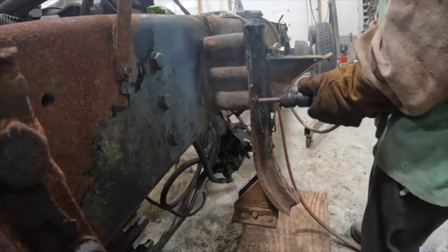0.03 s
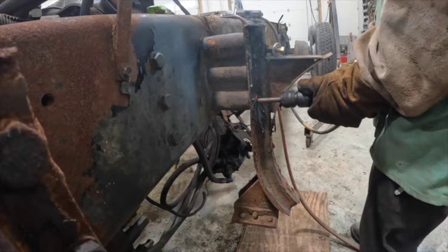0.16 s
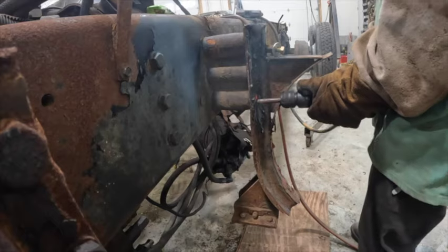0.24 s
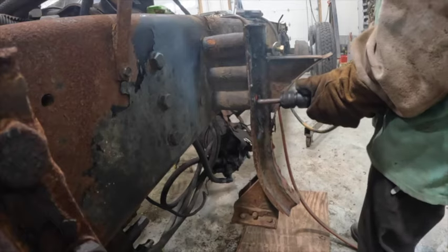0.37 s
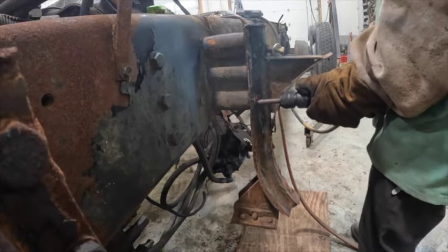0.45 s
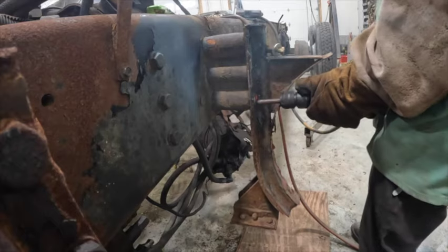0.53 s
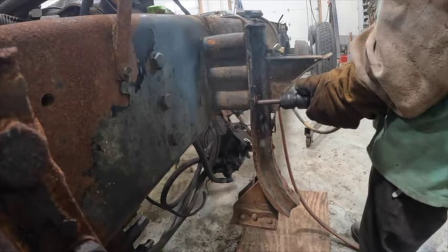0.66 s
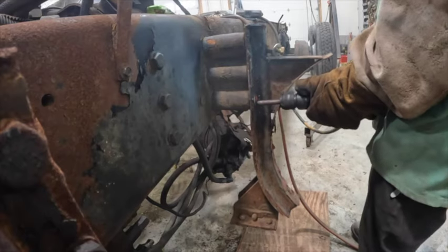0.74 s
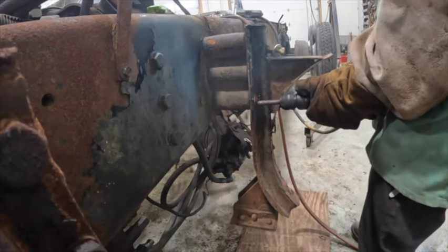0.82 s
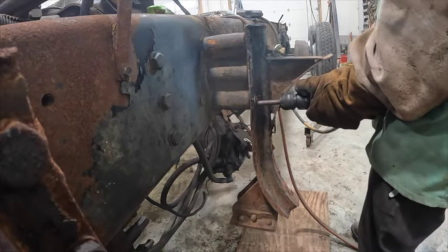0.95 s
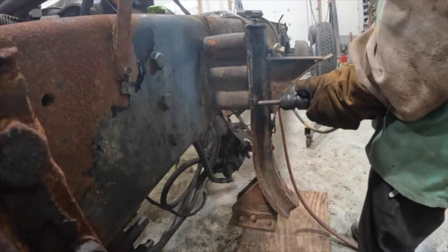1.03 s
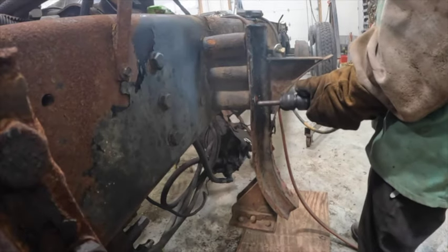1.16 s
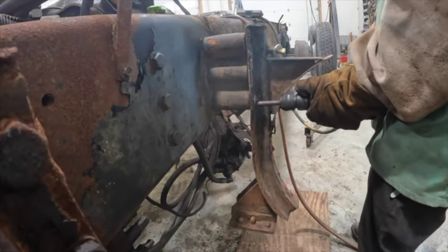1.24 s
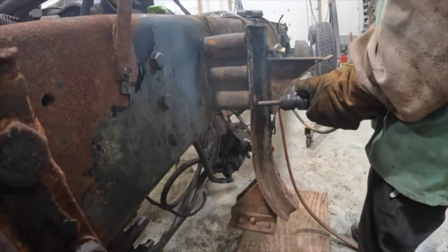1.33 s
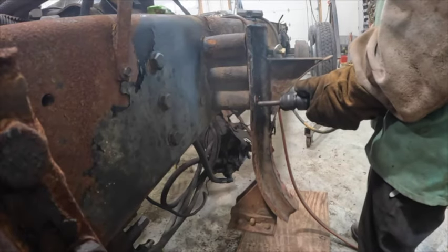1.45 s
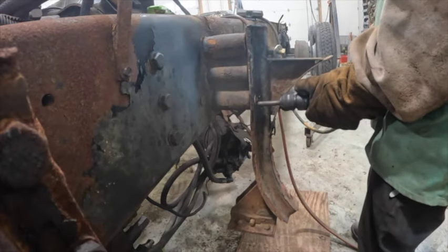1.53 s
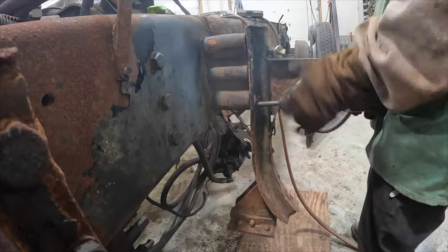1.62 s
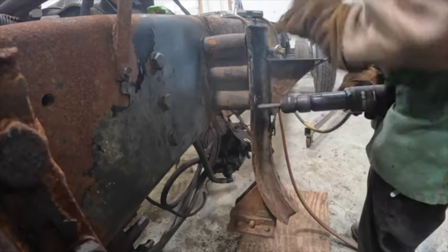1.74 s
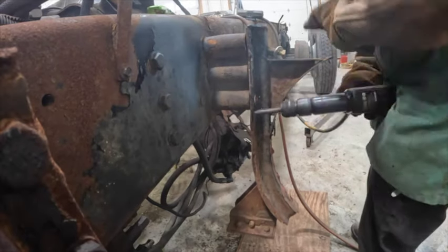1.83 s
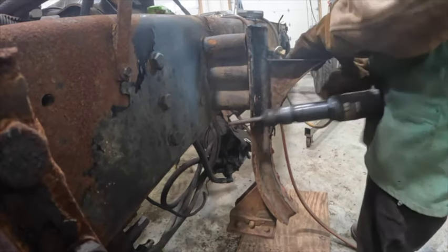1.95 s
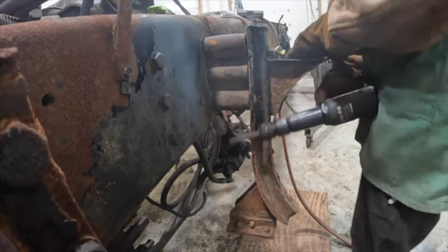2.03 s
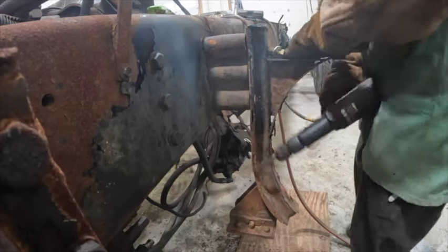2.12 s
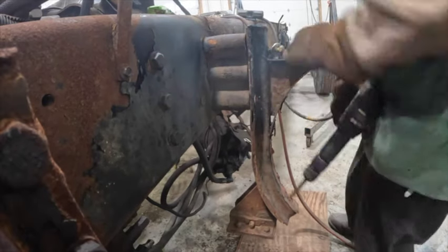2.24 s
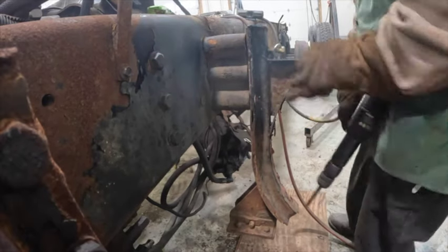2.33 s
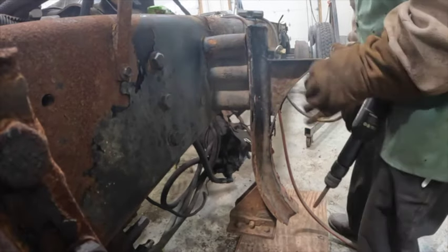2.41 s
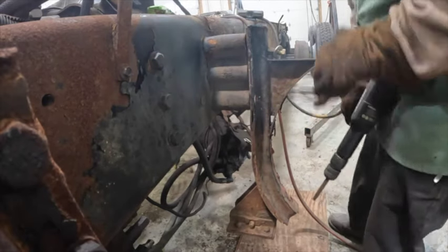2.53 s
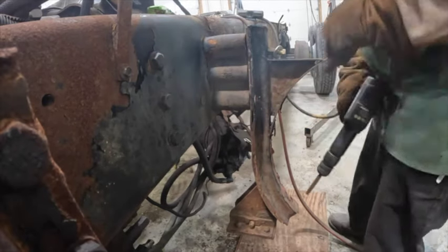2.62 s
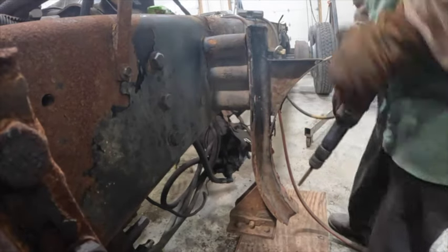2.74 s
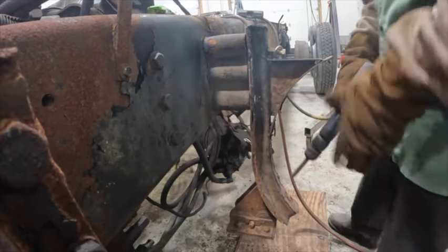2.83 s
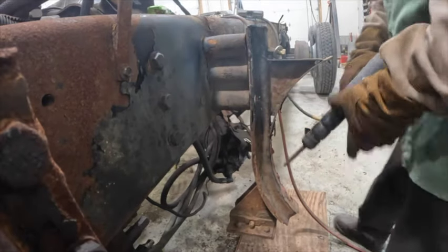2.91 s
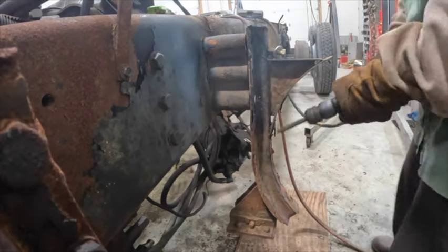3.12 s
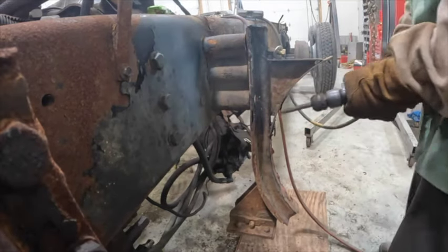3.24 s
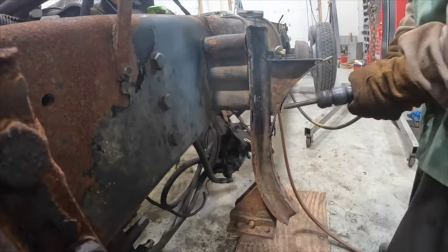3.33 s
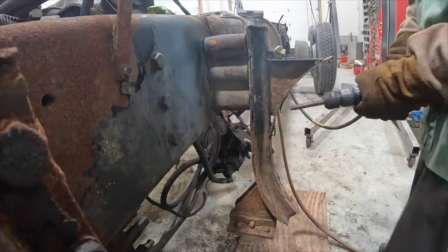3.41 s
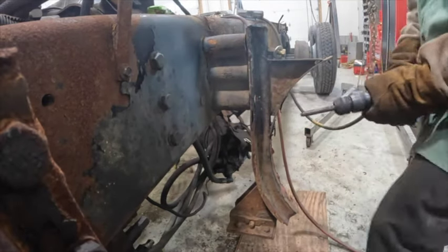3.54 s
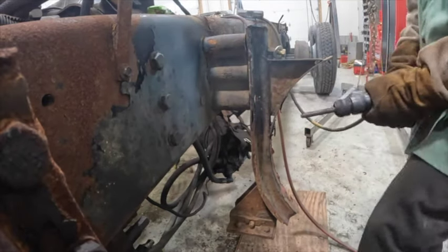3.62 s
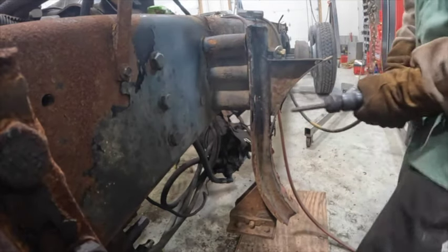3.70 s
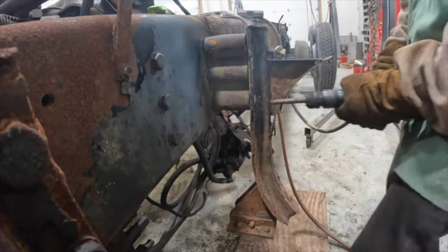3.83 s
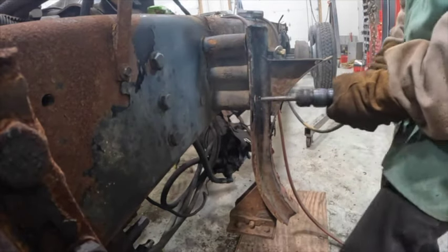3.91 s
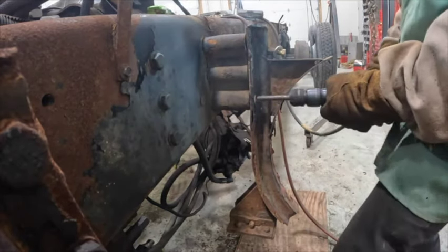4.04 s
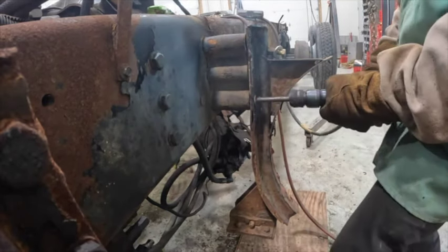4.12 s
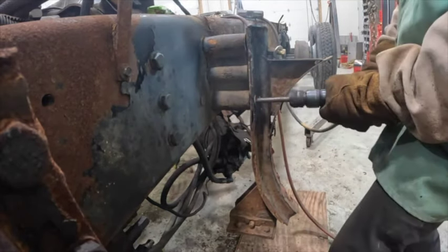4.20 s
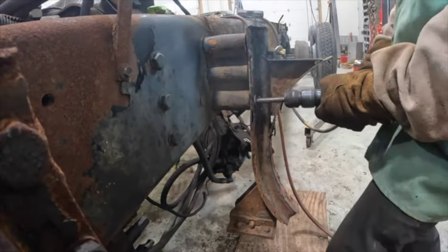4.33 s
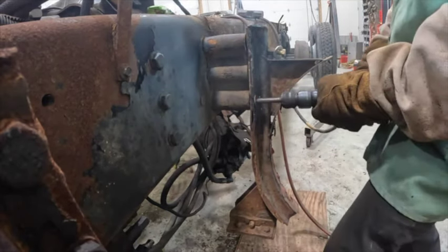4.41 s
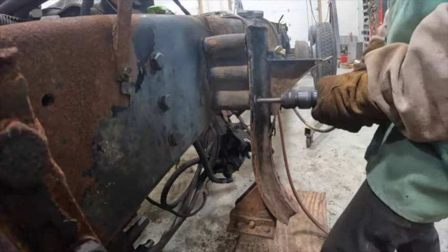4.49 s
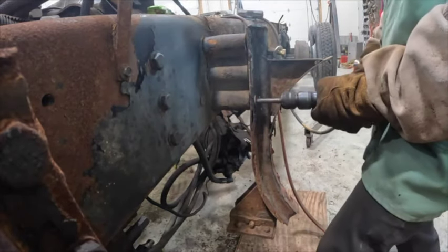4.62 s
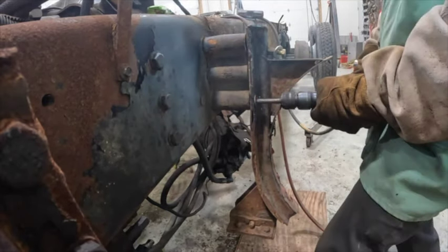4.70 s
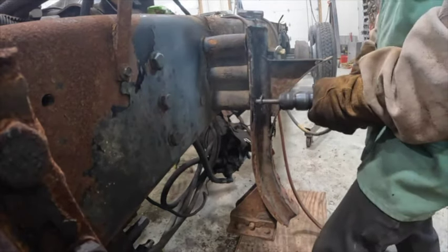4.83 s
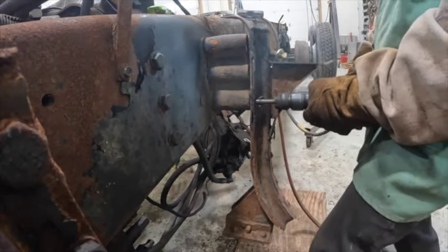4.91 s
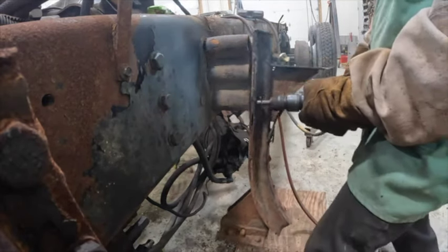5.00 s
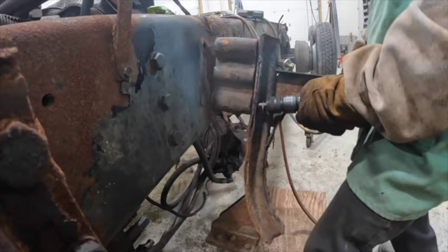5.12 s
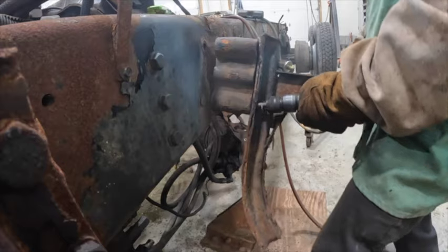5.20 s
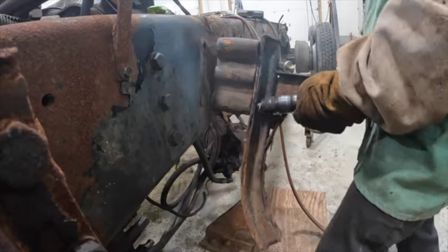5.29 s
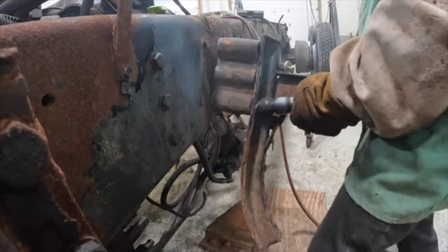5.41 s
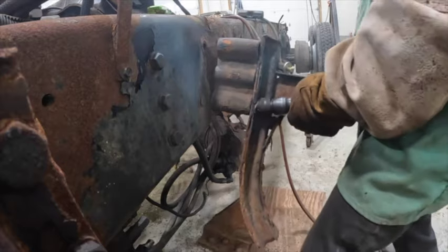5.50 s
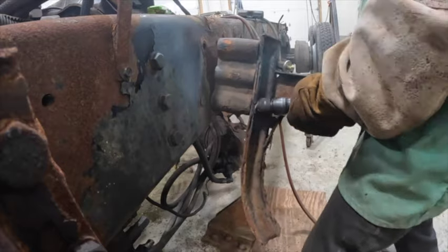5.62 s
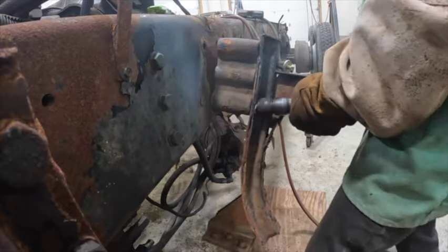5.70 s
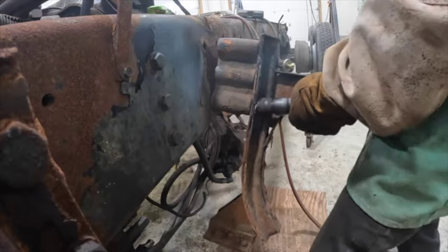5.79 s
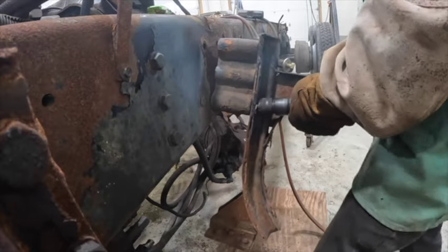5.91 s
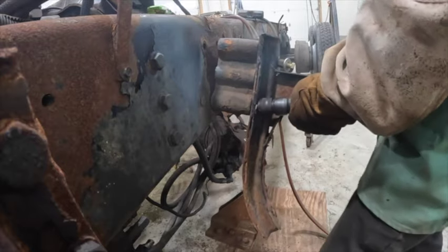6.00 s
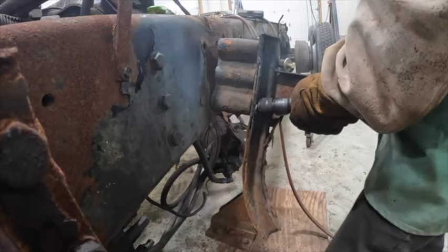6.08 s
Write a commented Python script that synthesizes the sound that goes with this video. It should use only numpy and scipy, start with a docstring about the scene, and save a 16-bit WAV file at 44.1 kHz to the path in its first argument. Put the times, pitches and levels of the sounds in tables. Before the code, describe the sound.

Rapid pneumatic hammering on heavy steel, a pause with gritty boot scuffs and metal taps, then shorter, looser hammer bursts in a reverberant hall.

```python
"""Air hammer in a reverberant workshop

An air hammer drives steel bolts through a truck frame in bursts of about 38 strokes a second. Each stroke
vents two damped pressure puffs and excites resonances of punch, bolt and frame; as the bolt gives way
the clang fades and the exhaust hisses. Between bursts, boots scrape on gritty concrete as shaped noise and
the punch taps the next bolt as decaying modes. A hall of decaying noise answers it all."""
import sys
import numpy as np
from scipy import signal
from scipy.fft import rfft, irfft, next_fast_len
from scipy.io import wavfile
from scipy.ndimage import uniform_filter1d

SR = 44100
rng = np.random.default_rng(int(sys.argv[2]) if len(sys.argv) > 2 else 0)


def store_wav(level_fs):
    """Save 16-bit WAV to argv[1]."""
    pcm = np.round(np.clip(np.atleast_2d(level_fs), -1, 1) * 32767)
    wavfile.write(sys.argv[1], SR, pcm.T.astype(np.int16))


N = 271215

# spectrum of gritty rubbing and clicks: (f/Hz, relative level/dB)
GRIT = [(150, -27), (350, 3.5), (750, -6.5), (1500, -1), (2500, -2.5), (4000, -15), (7500, -23.5),
        (11000, -41), (15500, -44.5)]


def amp(db):
    """Level to amplitude: 20 dB is a factor of ten."""
    return 10 ** (np.asarray(db) / 20)


def unit(x):
    """Normalisation to unit mean power."""
    return x / np.sqrt(np.mean(np.abs(x) ** 2) + 1e-20)


def along(points, hz):
    """Linear interpolation of (f, value) points over logarithmic frequency."""
    f, v = np.transpose(points)
    return np.interp(np.log(hz + 1), np.log(f), v)


def at(rows, times):
    """Linear interpolation of a time curve, one result for each value column."""
    s, *cols = np.transpose(rows)
    return np.array([np.interp(times, s, c) for c in cols])


def filtered(x, response):
    """Linear filtering by multiplication in frequency, with a response of mean power 1."""
    m = next_fast_len(len(x) + SR // 4)
    hz = np.fft.rfftfreq(m, 1 / SR)
    return irfft(rfft(x, m) * unit(response(hz)), m)[:len(x)]


def coloured(x, spectrum):
    """Spectral shaping: x filtered to the contour of (f/Hz, level/dB) points."""
    return filtered(x, lambda hz: amp(along(spectrum, hz)))


def add(track, s, sound):
    """Superposition: a sound is summed into the track at time s."""
    part = track[max(round(s * SR), 0):][:len(sound)]
    part += sound[:len(part)]


def leak():
    """Aeroacoustic whistling: air past the trigger valve gives gliding tones of wavering pitch."""
    # escaping air: (start t/s, length/s, starting f/Hz, glide/(Hz/s), peak level/dB)
    whistles = [(0, .09, 10500, 1990, -74), (.09, .13, 10040, 4600, -68.5), (4.91, 0.32, 14450, 400, -54.5)]
    track = np.zeros(N)
    for s, length, hz, glide, db in whistles:
        t = np.arange(int(length * SR)) / SR
        waver = unit(uniform_filter1d(rng.standard_normal(len(t)), size=60))
        phase = 2 * np.pi * np.cumsum(hz + glide * t + 90 * waver) / SR
        swell = np.sin(np.pi * t / length)
        add(track, s, amp(db) * swell * np.sin(phase))
    return track


def struck(events, modes, click_db, click_t60, damping, blur):
    """Modal impact: a contact excites a noise click and decaying modes; phase drift blurs their pitch."""
    t, track = np.arange(SR) / SR, np.zeros(N)
    onset = 1 - np.exp(-t / 0.00045)
    for s, db in events:
        drift = blur * np.cumsum(rng.standard_normal((len(modes), len(t))), axis=1)
        ring = np.zeros(len(t))
        for (hz, level, t60), phase in zip(modes, drift):
            decay = amp(level + rng.normal(0, 1.3) - 60 * t * damping / t60)
            ring += decay * np.sin(2 * np.pi * hz * t + phase)
        click = amp(click_db - 60 * t / click_t60) * coloured(rng.standard_normal(len(t)), GRIT)
        add(track, s, amp(db) * (ring + click) * onset)
    return track


def setting_the_punch():
    """Contact damping: the pressed tip barely rings on the bolt, then the tool's weight knocks the frame."""
    # punch tip touching the bolt: (t/s, relative level/dB)
    touches = [(0.0108, -35), (0.027, -34), (0.052, -36.5), (0.0767, -31.5), (0.1156, -34), (0.153, -39.5),
               (0.2024, -39), (0.208, -29), (4.3418, -26), (4.4099, -15), (4.4468, -22)]
    # tool leant against the frame: (t/s, relative level/dB)
    knocks = [(4.507, -19), (4.518, -23.5)]
    # modes of the tip: (f/Hz, relative level/dB, t60/s before the damping factor)
    tip_modes = [(894, -0.5, 0.15), (1188, -0.5, 0.21), (1254, -0.5, 0.18), (1830, -11, 0.196),
                 (2290, -5.5, 0.2), (2750, -9, 0.16), (3310, -1.5, 0.24), (3720, 0, 0.1),
                 (4030, -6.5, 0.12), (6900, -17.5, 0.14), (12520, -38.5, .25)]
    # modes of the knocked frame: (f/Hz, relative level/dB, t60/s before the damping factor)
    seated_modes = [(222, -7, 1), (320.4, 0, 0.3), (440, -7.5, 0.54), (687, -16, 0.46), (1841, -38, .8),
                    (2105, -26, 0.55), (5430, -21, 0.13), (7095, -24.5, 0.55)]
    pressed = [row for row in touches if row[0] < 1]
    loose = [row for row in touches if row[0] > 1]
    ticks = struck(pressed, tip_modes, click_db=16.5, click_t60=0.013, damping=12, blur=0)
    taps = struck(loose, tip_modes, click_db=0.5, click_t60=0.077, damping=3.0, blur=0.053)
    knock = struck(knocks, seated_modes, click_db=-7, click_t60=0.056, damping=2.3, blur=0.05)
    return amp(-15.0) * ticks + amp(-10.0) * taps + amp(-1) * knock


def strokes():
    """Reciprocating piston: speed sets each interval, and refilled hose pressure strengthens first strokes.

    Rows: (t/s, surge 0-1, puff level/dB, blow level/dB, hiss level/dB), all levels relative."""
    # pulls of the trigger: (first stroke t/s, number of strokes, relative puff level/dB)
    pulls = [(0.2977, 77, -19), (4.8017, 13, -16), (5.2905, 11, -15), (5.7902, 8, -15)]
    # piston speed, one curve a burst, slow at first: (t/s, stroke rate/(1/s))
    paces = [
        [(.3, 33.59), (.424, 37.75), (.543, 39.27), (1.304, 38.34), (1.359, 37.93), (1.392, 39.7),
         (1.773, 39.77), (1.968, 32.2), (2, 36.5)],
        [(4.8, 33.6), (4.89, 36.6), (5.03, 36.1), (5.11, 32)],
        [(5.32, 30.8), (5.36, 39.5), (5.46, 35), (5.54, 37.4)],
        [(5.79, 33.6), (5.82, 37.8)],
    ]
    # lone strokes as the piston starts or stalls: (t/s, puff, blow and hiss, each a relative level/dB)
    strays = [(0.2796, -12, -7.5, 3), (0.2923, -31, -5.5, -4), (2.343, -31, 0, -3.5), (2.441, -30, -7, -18),
              (4.782, -13.5, -14.5, -3.5), (4.793, -18, -5, -2), (5.211, -20, -1.5, -10.5),
              (5.621, -19.5, -1.5, -1), (5.773, -19.5, -8.5, -7), (6.031, -19.5, -8.5, 1)]
    surge_s, refill_s = 0.15, 4.5  # time constants of the surge's decay and the hose's recovery
    surge_puff_db, first_blow_db = 3.5, 3  # gains with a fully rested hose
    rows, stopped = [], -np.inf
    for (start, count, puff_db), pace in zip(pulls, paces):
        s, refill = start, 1 - np.exp((stopped - start) / refill_s)
        for k in range(round(count)):
            surge = refill * np.exp((start - s) / surge_s)
            blow_db = first_blow_db * refill * (k == 0)
            rows.append((s, surge, puff_db + surge_puff_db * surge, blow_db, 0))
            s += 1 / at(pace, s)[0]
        stopped = s
    lone = [(s, 0, puff_db, blow_db, hiss_db) for s, puff_db, blow_db, hiss_db in strays]
    return np.array(rows + lone)


def bursts(times, levels_db, rise, decay, linger_db, clean, scatter_db):
    """Impulsive excitation: a share 'clean' of power is one sharp contact, the rest decaying noise chatter."""
    t, track = np.arange(SR // 20) / SR, np.zeros(N)
    fall = np.exp(-t / decay) + amp(linger_db) * np.exp(-t / 0.031)
    shape = (1 - np.exp(-t / rise)) ** 2 * fall
    contact, clean = unit(1. * (t == 0)), np.clip(clean, 0, 1)
    for s, db in zip(times, levels_db):
        chatter = unit(shape * rng.standard_normal(len(t)))
        force = np.sqrt(clean) * contact + np.sqrt(1 - clean) * chatter
        add(track, s, amp(db + scatter_db * rng.standard_normal()) * force)
    return track


def ringing(force, modes):
    """Modal superposition: blows drive damped resonances, with separate strengths for each bolt."""
    second_bolt_s = 3
    moved = np.arange(N) / SR > second_bolt_s

    def bank(f, column):
        """Sum of second-order resonances with alternating sign."""
        total = 0
        for k, mode in enumerate(modes):
            centre, width, level = mode[0], mode[1], mode[column]
            damping = 1j * f * width
            total = total + (-1) ** k * amp(level) * damping / (centre ** 2 - f * f + damping)
        return total

    first = filtered(force * ~moved, lambda f: bank(f, column=2))
    second = filtered(force * moved, lambda f: bank(f, column=3))
    return first + second


def puff(t, hz, decay, front, suck):
    """Pressure transient: a brief dip as the port opens, a steep front, then a damped swing."""
    after = np.maximum(t, 0)
    swing = (1 - np.exp(-after / front)) * np.sin(2 * np.pi * hz * after + 0.47) * np.exp(-after / decay)
    dip = suck * np.exp(-((t + .0002) / .0004) ** 2)
    return swing - dip


def exhaust(times, levels_db, loads, surges):
    """Pulsed venting: forward and return puffs; a free piston vents shorter ones and rings the barrel."""
    # air column of the barrel: (f/Hz, relative level/dB, t60/s)
    barrel_modes = [(242, -29, 0.04), (508, -16, .04), (599, -23.5, 0.05), (650, -24.5, 0.055),
                    (984, -23.5, 0.054)]
    loaded_hz, free_hz, return_hz = 125, 216.4, 238  # nominal swing: leant on, running free, free return
    surge_depth = 0.16  # share by which a full surge slows the loaded swing
    lead = .003  # seconds kept ahead of the front for the dip
    t, track = np.arange(SR // 20) / SR - lead, np.zeros(N)
    after = np.maximum(t, 0)
    barrel = sum(amp(1.5 + db - 60 * after / t60) * np.sin(2 * np.pi * hz * after)
                 for hz, db, t60 in barrel_modes)
    # the tool kicks back into the hands
    recoil = -.22 * np.sin(2 * np.pi * 64 * after) * np.exp(-after / .012)
    for s, db, load, surge in zip(times, levels_db, loads, surges):
        pace = np.exp(.03 * rng.standard_normal())
        back = t - rng.normal(.0082, .00015)  # time from the return stroke
        loaded = 1.1 * puff(t, loaded_hz * pace * (1 - surge_depth * surge), .0052, .0001, .3)
        loaded += .33 * puff(back + .0007, 180, .004, .0004, .1)
        free = 1.8 * puff(t, free_hz * pace, .0028, .0006, .36)
        free += 1.3 * puff(back, return_hz, .0026, .0006, .33)
        blend = load * loaded + (1 - load) * (free + barrel) + (1 - load / 2) * recoil
        add(track, s - lead, amp(db + 11.0) * blend)
    return track


def hammer():
    """Source-filter coupling: strokes vent air and excite steel; as bite is lost, ring turns to hiss."""
    # how hard the worker leans on the tool: (t/s, load 0-1)
    load_curve = [(.3, 0.87), (1.95, 0.84), (1.99, 0), (2.4, 0), (4.8, 0.57), (5.15, 0.37), (5.35, 0.26),
                  (6.0, 0.53)]
    # how solidly the bolt resists the punch: (t/s, bite 0-1)
    bite_curve = [(.3, 0.82), (.47, 0.98), (.85, 0.85), (1.4, 0.91), (1.8, 0.86), (1.91, 0.94),
                  (1.96, 0.82), (1.99, 0.2), (2.4, 0), (4.83, 0.95), (4.92, 0.72), (5.31, 0.56),
                  (5.36, 0.43), (5.47, .45), (5.8, 0.36)]
    # the frame's clang: (t/s, relative level/dB)
    clang_curve = [(.33, -23.5), (.48, -28), (.8, -19.5), (1.6, -19), (1.95, -23.5), (2.15, -34.5),
                   (2.44, -22.5), (4.82, -22), (4.92, -31.5), (5.07, -22.5), (5.13, -16.5), (5.3, -17.5),
                   (5.42, -32.5), (5.9, -27)]
    # punch and bolt: (f/Hz, width/Hz, first bolt relative level/dB, second bolt relative level/dB)
    punch_modes = [(2670, 32, -11.5, -10.5), (3272, 112, 3, 2.5), (3367, 345, -3, -4), (3720, 70, -5, -0.5),
                   (3980, 120, -12, -16.5), (4860, 210, -15.5, -21), (5420, 150, -14.5, -36),
                   (5900, 87, -14.5, -32), (6070, 61, -31.5, -16), (6937, 260, -16.5, -20.5),
                   (6970, 100, -11.5, -18.5)]
    # truck frame: (f/Hz, width/Hz, first bolt relative level/dB, second bolt relative level/dB)
    frame_modes = [(487, 32, -0.5, 4), (788, 54, -5, -5.5), (851, 31.5, 3, -2), (950, 98, -3.5, -6),
                   (1094, 79, 0, -0.5), (1260, 156, -6, -8), (1435, 75, -5, -5.5), (1693, 29, -5.5, 4.5),
                   (1849, 100, -2.5, -6), (2148, 24.8, -6.5, -4.5), (2540, 380, -23.5, -11.5)]
    # crack of the blow: (f/Hz, relative level/dB)
    crack_spectrum = [(300, -14), (700, 3), (2500, 3.5), (4000, 0), (5500, -6), (7300, -2.5), (8800, -14.5),
                      (10700, -13.5), (12600, -21), (15800, -28.5)]
    # hiss of the exhaust: (f/Hz, relative level/dB)
    hiss_spectrum = [(400, -15), (1200, -24), (3400, -2), (5000, -14.5), (7200, -10.5), (8000, 2),
                     (8400, 8), (8750, -0.5), (10000, -13.5), (11500, -24.5), (12500, -16), (13500, -23),
                     (15800, -30.5)]
    # turbulent exhaust: (f/Hz, relative level/dB)
    eddy_spectrum = [(20, -9), (40, 4.5), (75, -2), (150, -7), (240, 1), (330, -5.5), (600, -11),
                     (1200, -27), (3000, -76)]
    ring_loss_db, crack_loss_db, surge_crack_db = 39, 3.5, 7.5  # losses with no bite; gain at full surge
    seal_db, seal_bite, seal_width = 17, 0.5, 0.046  # hiss loss when pushed home; bite closing the port
    calm_db = 3  # a free piston stirs fewer eddies

    s, surge, puff_db, blow_db, hiss_db = strokes().T
    s = s + rng.normal(0, .00012, len(s))
    bite, load = at(bite_curve, s)[0], np.clip(at(load_curve, s)[0], 0, 1)
    frame_db = blow_db + at(clang_curve, s)[0] - 8.5
    ring_db = blow_db - 22 - ring_loss_db * (1 - bite)
    crack_db = blow_db - 31 + surge_crack_db * surge - crack_loss_db * (1 - bite)
    hiss_db = hiss_db - 32 - seal_db / (1 + np.exp((seal_bite - bite) / seal_width))
    eddy_db = puff_db - 9.5 - calm_db * (1 - load)

    frame_force = bursts(s, frame_db, rise=.0001, decay=0.0055, linger_db=2.0, clean=0.16, scatter_db=0.5)
    frame = ringing(frame_force, frame_modes)
    punch_force = bursts(s - .0002, ring_db, rise=.0001, decay=0.00307, linger_db=-28.5,
                         clean=0.58, scatter_db=0.85)
    punch = ringing(punch_force, punch_modes)
    crack_noise = bursts(s - .0003, crack_db, rise=0.00019, decay=0.0049, linger_db=-30,
                         clean=0.045, scatter_db=1.9)
    crack = coloured(crack_noise, crack_spectrum)
    hiss_noise = bursts(s + .0003, hiss_db, rise=0.0011, decay=0.0027, linger_db=-24.5,
                        clean=0, scatter_db=1.53)
    hiss = coloured(hiss_noise, hiss_spectrum)
    eddy_noise = bursts(s, eddy_db, rise=0.00048, decay=0.0085, linger_db=-4, clean=0, scatter_db=1)
    eddies = coloured(eddy_noise, eddy_spectrum)
    puffs = exhaust(s, puff_db + .5 * rng.standard_normal(len(s)), load, surge)
    return puffs + eddies + frame + crack + hiss, punch


def boots():
    """Granular friction: a heel thuds and the sole drags over sparse grains, a few of them large."""
    # boots scraping the floor: (t/s, length/s, scrape relative level/dB, heel relative level/dB)
    scuffs = [(3.3, .05, -52.5, -79), (3.328, 0.054, -53.5, -72), (3.502, 0.067, -55.5, -70),
              (3.829, 0.057, -42.5, -36), (3.856, 0.114, -43.5, -47), (3.928, 0.017, -36.5, -39),
              (3.954, 0.04, -35, -44), (3.982, 0.084, -45, -58), (4.104, 0.045, -48.5, -60),
              (4.23, .05, -54, -50)]
    # heel thud: (f/Hz, relative level/dB)
    heel_spectrum = [(30, -29), (80, 2), (200, -2.5), (450, -6), (1000, -12), (3000, -48)]
    t, scrape, thud = np.arange(SR // 2) / SR, np.zeros(N), np.zeros(N)
    for s, length, db, heel_db in scuffs:
        shape = (1 - np.exp(-t / 0.0018)) * np.exp(-(t / length) ** 2)
        hits = rng.random(len(t)) < 1800 / SR  # about 1800 grains a second
        grains = unit(rng.laplace(size=len(t)) * hits)
        add(scrape, s, amp(db + 2.5) * shape * grains)
        add(thud, s, amp(heel_db) * shape * rng.standard_normal(len(t)))
    return coloured(scrape, GRIT) + coloured(thud, heel_spectrum)


def workshop(x):
    """Reverberation by convolution: near steel and floor, a decaying diffuse hall and the humming frame."""
    # hall decay time: (f/Hz, t60/s)
    hall_decay = [(60, 1.69), (160, 1.7), (400, 2.24), (1100, 2.92), (2900, 2.27), (5000, 1.47),
                  (8400, 1.08), (14000, 0.4)]
    # the hall's answer: (f/Hz, relative level/dB)
    hall_level = [(50, -3.5), (110, -10), (165, -5.5), (222, -1), (290, -10.5), (366, -2), (470, -5),
                  (750, -2), (1050, -1.5), (1700, -6), (3300, -6), (6000, -5), (8400, -9.5), (14000, -5.5)]
    # long low resonances of the truck frame: (f/Hz, gain at resonance/dB, t60/s)
    hum_modes = [(219, 4, 1.48), (365, 2, 2.2)]
    hz, t, z = signal.stft(rng.standard_normal(SR * 5 // 2), SR, nperseg=512)
    fade = amp(-60 * t / along(hall_decay, hz)[:, None])
    # equal power in every band before the hall's own levels apply
    fade *= amp(along(hall_level, hz))[:, None] / np.sqrt(np.mean(fade ** 2, axis=1, keepdims=True))
    tail = signal.istft(z * fade, SR, nperseg=512)[1]
    age = np.arange(len(tail)) / SR
    tail = tail / np.sqrt(len(tail)) * (1 - np.exp(-age / .012))
    for hum_hz, db, t60 in hum_modes:
        dying = amp(-60 * age / t60)
        tail = tail + 2 * amp(db) * np.cos(2 * np.pi * hum_hz * age) * dying / dying.sum()
    near = rng.standard_normal(len(age)) * amp(-60 * age / 0.13) * (age > .004)
    response = tail + amp(-8.5) * near / np.linalg.norm(near)
    return signal.fftconvolve(x, response)[:N]


def scene():
    """Superposition of direct and reverberant sound in mono; the slim punch sends less into the hall."""
    # steady background noise: (f/Hz, relative level/dB)
    still_spectrum = [(15, -28), (25, 5.5), (158, 4), (363, -7.5), (427, -27), (811, -24.5), (1030, -6),
                      (1630, -23.5), (2430, -8.5), (12400, -42), (15000, -47.5)]
    tool, punch = hammer()
    direct = tool + setting_the_punch() + boots() + leak()
    hall = workshop(direct + amp(-3) * punch)
    still = amp(-54.5) * coloured(rng.standard_normal(N), still_spectrum)
    mono = direct + punch + hall + still
    return np.array([mono, mono])


def record(dry):
    """Soft saturation and band limiting: the highest peaks are rounded and both spectral ends cut."""
    low_cut_hz, top_hz = 5, 15850
    rounded = dry / (1 + np.abs(dry / .96) ** 6) ** (1 / 6)
    m = next_fast_len(N + SR // 4)
    hz = np.fft.rfftfreq(m, 1 / SR)
    band = hz / np.hypot(hz, low_cut_hz) * (hz < top_hz)
    return irfft(rfft(rounded, m) * band, m)[:, :N]


dry = scene()
out = record(dry)
store_wav(out)
```